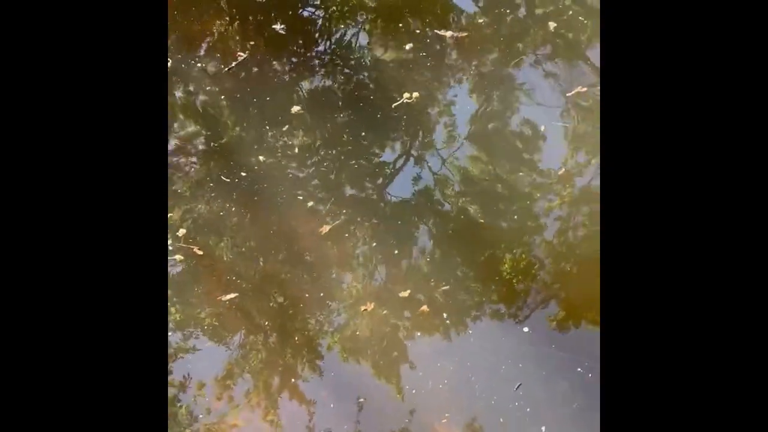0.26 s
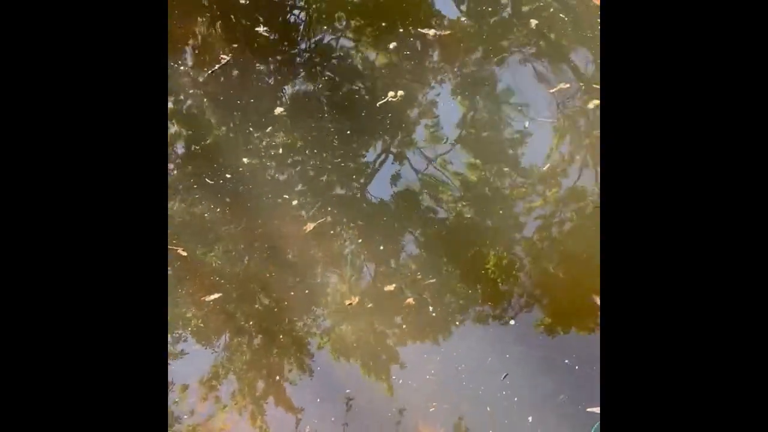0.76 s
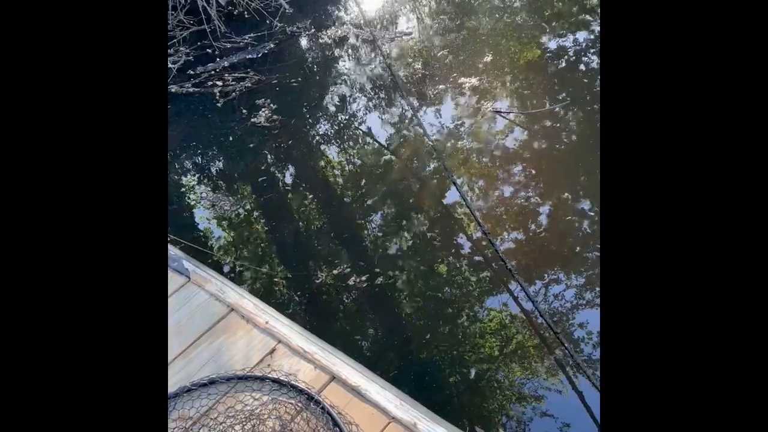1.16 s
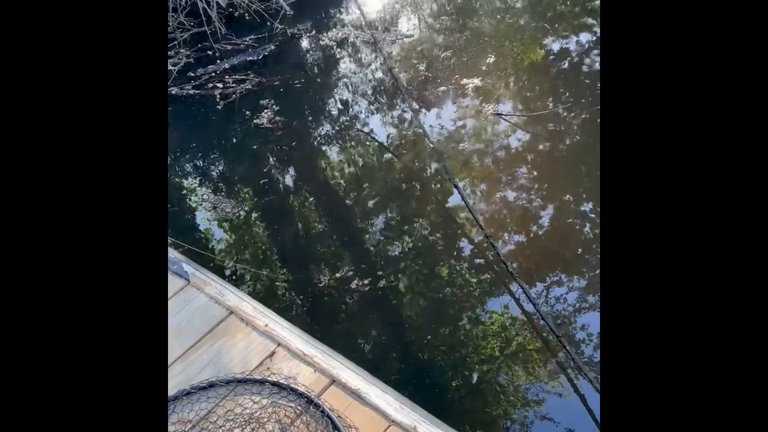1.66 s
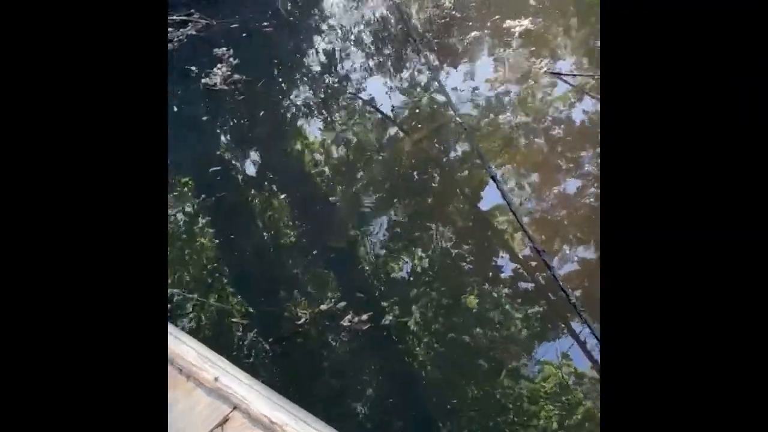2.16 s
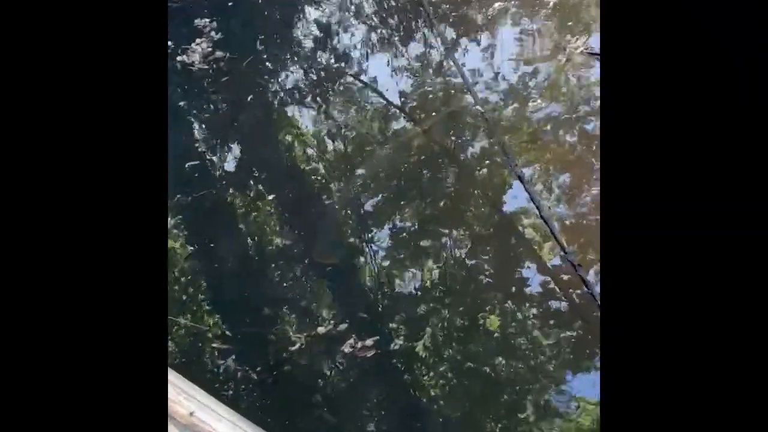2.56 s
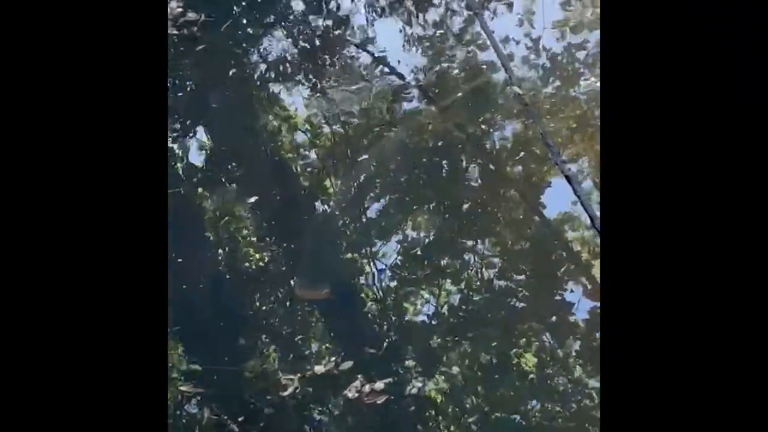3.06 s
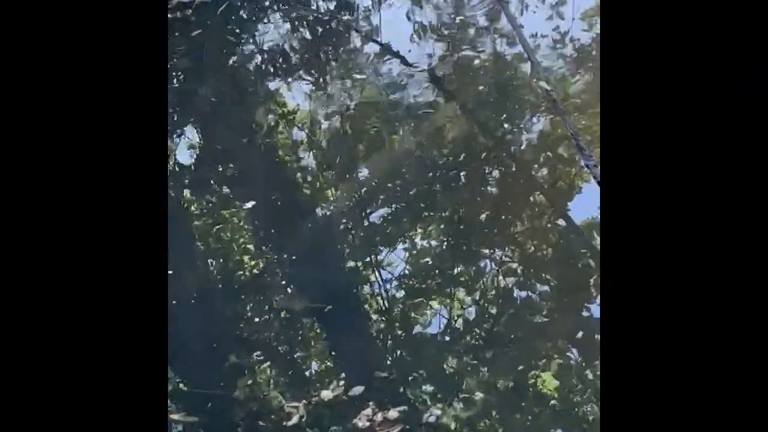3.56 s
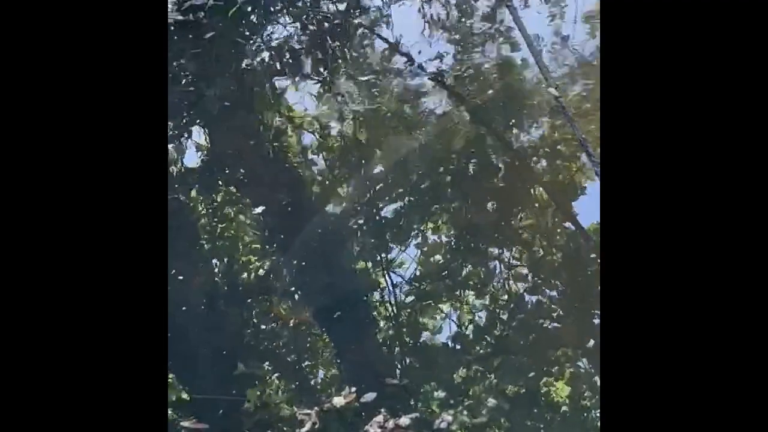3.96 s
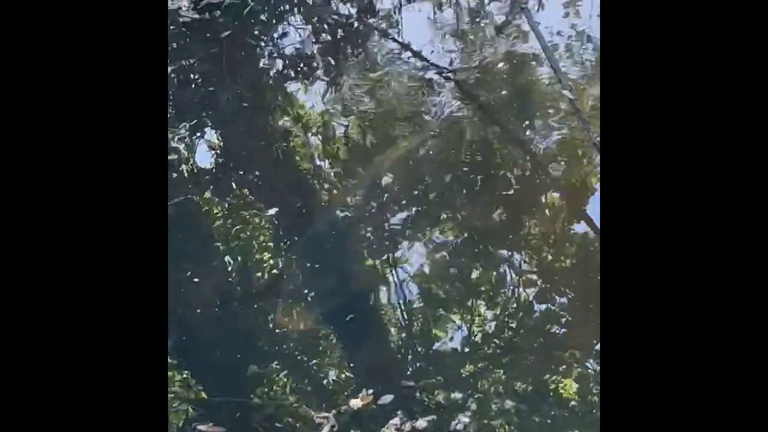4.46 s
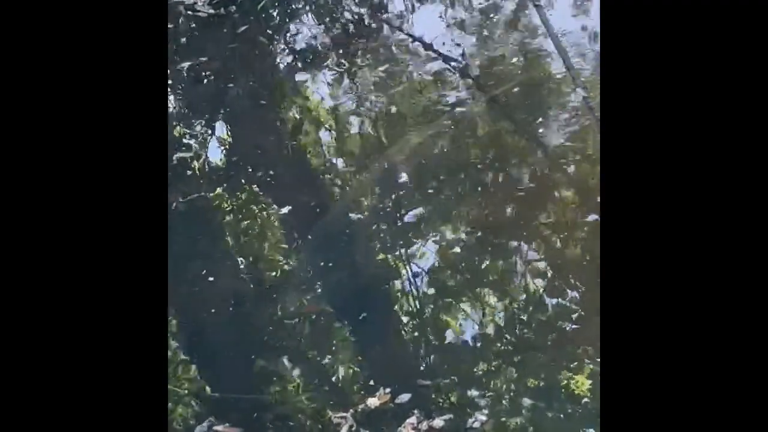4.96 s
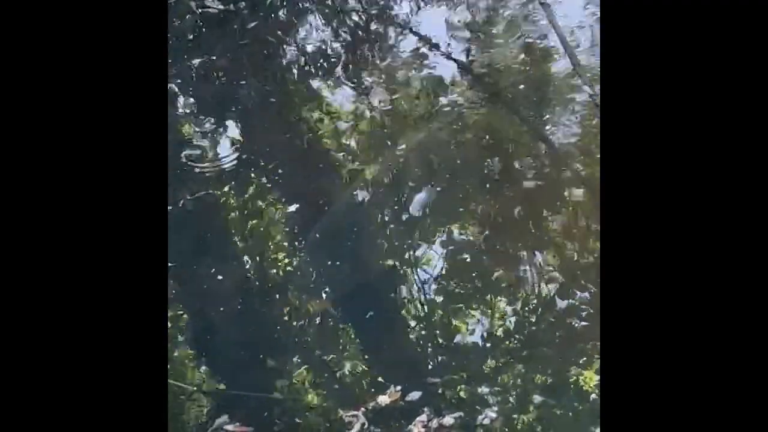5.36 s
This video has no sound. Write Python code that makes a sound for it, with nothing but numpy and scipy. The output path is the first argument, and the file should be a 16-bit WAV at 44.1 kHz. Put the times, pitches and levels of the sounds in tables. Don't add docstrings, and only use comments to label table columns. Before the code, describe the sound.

Quiet wooded pond heard from a boat in stereo. Distant road rumble opens, then a brief buzzy crackle and tiny silence at one second cut to a fuller low vehicle drone. It swells mid-way and fades after four seconds, with small hull knocks and faint leaf ticks. A bright bird chip rings among trees, followed by weak calls.

```python
import sys
import numpy as np
from scipy import signal
from scipy.fft import rfft, irfft, next_fast_len
from scipy.io import wavfile
from scipy.ndimage import uniform_filter1d

SR = 44100
rng = np.random.default_rng(int(sys.argv[2]) if len(sys.argv) > 2 else 0)


def dump(signal):
    limited = np.clip(np.atleast_2d(signal).T, -1, 1)
    pcm = np.round(limited * 32767).astype(np.int16)
    wavfile.write(sys.argv[1], SR, pcm)


def gain_from_decibels(decibels):
    exponent = np.asarray(decibels, float) / 20
    return 10 ** exponent


N = 247401
T = np.arange(N) / SR
M = next_fast_len(N, True)
F = np.maximum(np.fft.rfftfreq(M, 1 / SR), 1)
SLIP_S, MUTE_S, BACK_S = 1.00528, 1.0397, 1.05168


def over_hz(table, column=1):
    rows = np.array(table, float)
    return np.interp(np.log(F), np.log(rows[:, 0]), rows[:, column])


def unit(x):
    return x / np.sqrt(np.mean(x ** 2))


def walk(rate):
    k = int(SR / rate)
    held = np.repeat(rng.standard_normal(N // k + 1), k)
    return 1.3 * uniform_filter1d(uniform_filter1d(held, k), k)[:N]


def band(x, hz, width):
    edges = np.clip([hz - width / 2, hz + width / 2], 20, .45 * SR)
    return signal.sosfilt(signal.butter(2, edges, "band", fs=SR, output="sos"), x)


def filtered(x, response):
    return irfft(rfft(x, M) * response, M)[:N]


def bell(hz, width, power=2):
    return np.exp(-((F - hz) / width) ** power)


def progress(start, length):
    return np.clip((T - start) / length, 0, 1)


LAYER_HZ = [65, 420, 1000, 4000, 6500]
# frequency in Hz, level in dB per Hz.
LOW_COLOUR = [
    [(12, -48), (20, -16), (33, -19), (60, -8), (92, -2), (134, -9.5), (151, -13.5), (177, -12.5),
     (232, -23.5), (288, -20.5), (367, -25), (431, -23.5), (500, -27), (650, -57), (1100, -120)],
    [(12, -50.5), (20, -28), (35, -15.5), (60, 0), (98, -5.5), (130, -2.5), (168, -11.5), (208, -10),
     (238, -13.5), (280, -16.5), (316, -18), (403, -20.5), (500, -27.5), (650, -55), (1100, -120)],
]
# frequency in Hz, level in dB per Hz.
HIGH_COLOUR = [
    [(210, -33), (350, -7), (431, -1.5), (585, -12), (834, -3), (903, -8), (1010, -8.5), (1540, -17),
     (2020, -23), (2330, -23), (3660, -37), (4030, -42), (6630, -53), (7540, -47), (16300, -57.5)],
    [(210, -31), (350, -1), (379, -6), (604, -11.5), (645, -5.5), (710, -11), (769, -7), (903, -6),
     (1130, -13.5), (2050, -23), (2350, -29), (2650, -39.5), (2900, -38), (3270, -33.5), (5920, -51),
     (7400, -48), (9700, -50), (10350, -56.5), (11100, -51.5), (16300, -59)],
]
BAND_FLICKER_DB = np.repeat([1.2, 1.9, .4], [14, 2, 4])
# time in seconds, level in dB.
NEARNESS = [
    [(0, 1.5), (.35, 1), (.7, -1), (1, -1)],
    [(1.06, 1.5), (1.35, 1), (1.65, 3.5), (1.9, 1.5), (2.1, 4), (2.35, 1.5), (2.6, 4.5), (2.9, 1.5),
     (3.2, 2), (3.7, -0.5), (4.1, -0.5), (4.5, -2.5), (5, -3), (5.6, -3)],
]
TYRE_ROAR_DB = (-62.5, -63.5)
NEARNESS_SHARE = [
    [2, 1.5, 0.56, 1.7, .05],
    [0.023, 1.45, 0.73, 1.1, .05],
]
LAYER_SURGE_DB = [0.96, 1.3, 0.25, 0.48, .05]
# frequency in Hz, right lead in radians, left minus right in dB, unshared share (0-1).
PORT_OFFSETS = [(70, .03, 0, .015), (95, .047, 0, .02), (140, .04, .1, .04), (200, .13, .6, .1),
                (285, .28, 1.3, .18), (400, .58, 1, .3), (570, .9, .2, .45), (800, .45, .9, .35),
                (1150, .6, 1.5, .45), (1600, .5, .7, .45), (1900, 0, .5, .25), (2400, -1.5, .5, .55),
                (3000, -1.6, 0, .5), (3900, -1, 0, .4), (4600, -1.3, -.3, .55), (5700, -1.6, 0, 1),
                (6200, 1.6, 0, 1), (6800, 1.1, 0, .7), (7200, .5, 0, .3), (7500, .1, 0, .1),
                (13000, .1, 0, .1)]


def road_colours():
    colours = []
    for roar_db, low, high in zip(TYRE_ROAR_DB, LOW_COLOUR, HIGH_COLOUR):
        lo, hi = over_hz(low), over_hz(high)
        join_hz = 420
        join = np.searchsorted(F, join_hz)
        db = np.where(F < join_hz, lo - lo[join] + hi[join], hi)
        roar = gain_from_decibels(db[(F > 700) & (F < 1600)])
        colours.append(gain_from_decibels(db + roar_db) / np.sqrt(np.sum(roar ** 2) / len(F)))
    return np.array(colours)


def road():
    port_share = np.array([np.ones_like(F), np.clip(over_hz(PORT_OFFSETS, 3), 0, 1)])
    noise = rfft(rng.standard_normal((2, M))) * port_share
    colours = road_colours()[:, None]
    near_before, near_after = (np.interp(T, *np.transpose(rows)) for rows in NEARNESS)
    after = T > SLIP_S
    swell = []
    for early, late, surge_db in zip(*NEARNESS_SHARE, LAYER_SURGE_DB):
        swell.append(np.where(after, late * near_after, early * near_before) + surge_db * walk(5))
    out = 0
    half_octaves = np.log2(F / 25) * 2
    for k in range(20):
        share = np.cos(np.clip(half_octaves - k, -1, 1) * np.pi / 2) ** 2
        place = np.interp(np.log(25 * 2 ** (k / 2)), np.log(LAYER_HZ), np.arange(5))
        i = min(int(place), 3)
        db = swell[i] + (place - i) * (swell[i + 1] - swell[i]) + BAND_FLICKER_DB[k] * walk(12)
        before_sound, after_sound = irfft(noise * share * colours, M)[..., :N]
        out = out + gain_from_decibels(db) * np.where(after, after_sound, before_sound)
    return out


# centre time in seconds, length in seconds, band centre in Hz, level in dB.
LEAF_SWELLS = [(2.272, 0.015, 5274, -86), (2.5, .015, 5070, -87.5), (2.492, 0.22, 12550, -88.5),
               (2.385, .008, 12830, -91), (2.416, .02, 13770, -87), (2.444, .012, 14000, -84),
               (2.465, .016, 12000, -84), (2.497, .022, 12850, -83.5), (2.527, .01, 13200, -85.5),
               (2.556, .014, 13000, -82), (2.59, .016, 12500, -87.5), (2.612, .008, 12190, -90),
               (3.494, .007, 5000, -81.5), (1.31, .015, 5000, -89.5), (3.02, .015, 5100, -95),
               (3.572, .012, 10520, -88), (4.66, 0.089, 3650, -89), (4.8, 0.12, 3800, -87),
               (4.85, 0.087, 4600, -89), (4.94, .04, 5200, -88), (5.17, 0.086, 3380, -87),
               (5.2, 0.12, 5000, -91), (5.33, 0.12, 3530, -89), (5.3, .2, 4800, -90),
               (5.58, .08, 3500, -86), (5.0, .06, 6150, -91), (5.05, .3, 4700, -93),
               (.163, .01, 900, -61.5), (1.564, .01, 903, -58), (2.033, .01, 795.6, -54.5),
               (3.252, .01, 900.3, -65), (2.749, 0.044, 11990, -93), (3.25, 0.011, 5100, -84.5),
               (3.493, 0.0054, 7900, -77), (3.555, 0.017, 8910, -76.5), (3.556, 0.016, 12200, -77.5),
               (3.655, .04, 3228, -93), (3.897, .04, 8390, -85), (3.902, 0.042, 12900, -86),
               (3.995, 0.048, 8000, -90), (4.203, 0.01, 13000, -86), (4.213, 0.0034, 12000, -74.5),
               (4.748, 0.045, 14560, -86), (4.781, 0.073, 253, -57), (4.94, 0.06, 4300, -86),
               (4.95, .09, 3600, -86), (.19, .05, 3700, -87.5), (.3, .03, 3750, -87), (.5, .35, 7800, -97),
               (1.53, .06, 7500, -93), (3.494, .006, 12000, -85), (3.556, .016, 5100, -86),
               (5.03, 0.13, 3970, -85.5)]
# centre time in seconds, length in seconds, Hz, level
# in dB.
OPPOSED_SWELLS = [
    (2.4, 1.6, 10480, -99),
    (2.5, .1, 14300, -93),
    (5.05, .07, 5650, -84),
    (5.202, .016, 5700, -86),
    (4.93, .04, 4400, -86),
]


def rustles(swells):
    grains_per_s, grains_each = 3200, 48
    width_share, tick_s = 0.18, 0.0075
    out = np.zeros(N)
    for s, length, hz, db in swells:
        reach = 1.5 * length + .01
        near = slice(max(int((s - reach) * SR), 0), int((s + reach) * SR))
        chance = rng.random((3, len(T[near])))
        rate = grains_per_s + grains_each / length
        width = hz * (width_share + .5 * (tick_s / length) ** 2)
        strength = gain_from_decibels(-2.2 * np.log(chance[1] + .02))
        grains = (chance[0] < rate / SR) * strength * np.sign(chance[2] - .5)
        envelope = np.exp(-4 * ((T[near] - s) / length) ** 2)
        out[near] += gain_from_decibels(db) * unit(band(grains, hz, min(width, .4 * hz))) * envelope
    return out


# start in seconds, length in seconds, start in Hz, end in Hz, level in dB.
FAR_WHISTLES = [(-.05, 0.19, 3300, 3260, -85), (.29, 0.19, 8500, 8540, -101), (.3, 0.34, 2310, 2280, -78),
                (-.03, 0.12, 2330, 2310, -80), (.4, 0.053, 7320, 7440, -88), (.42, 0.09, 7700, 7800, -93),
                (.53, .06, 7750, 7750, -95), (.65, .04, 7800, 7750, -96), (.46, .06, 7350, 7350, -95),
                (1.06, 3.7, 9480, 9490, -107), (1.07, 2.7, 9690, 9800, -106), (1.5, 0.079, 7550, 7600, -91),
                (2.78, .04, 6720, 6650, -91), (5.27, 0.039, 7403, 7200, -94), (5.34, .04, 7150, 6700, -93),
                (4.76, .1, 3600, 3720, -91), (4.92, 0.12, 4250, 3800, -89), (5.11, .14, 4900, 5100, -101),
                (5.14, 0.07, 3500, 3250, -88), (5.51, 0.12, 7000, 6700, -94), (5.28, 0.13, 3680, 3500, -91)]
# start in seconds, length in seconds, start in Hz, end in Hz, level in dB.
FAR_HUMS = [
    (0.35, 0.42, 92, 99.5, -47.5),
    (0, 0.62, 54, 200, -53),
    (1.5, 0.87, 100, 190, -56.5),
    (4, 0.23, 80, 72.4, -49),
    (3.5, .1, 82, 74, -48),
]
# start in seconds, length in seconds, start in Hz, end in Hz, level in dB.
OPPOSED_WHISTLES = [
    (4.95, .19, 6350, 5450, -89),
]


def whistles(notes, scoop, shake):
    out = np.zeros(N)
    for s, length, hz0, hz1, db in notes:
        u = progress(s, length)
        hz = (hz0 + (hz1 - hz0) * u ** 2) * (1 - scoop * np.exp(-u / .06) + shake * walk(140))
        envelope = np.clip(6 * u * (1 - u), 0, 1)
        out += gain_from_decibels(db + 2.5 * walk(70)) * envelope * np.sin(2 * np.pi * np.cumsum(hz) / SR)
    return out


# start in seconds, length in seconds, top in Hz, end in Hz, level in dB.
ARCHED_CALLS = [
    (5.25, .125, 5660, 5400, -76),
    (5.478, 0.1, 5670, 5400, -78),
]


def arches():
    out = np.zeros(N)
    for s, length, hz0, hz1, db in ARCHED_CALLS:
        u = progress(s, length)
        scoop = .1 * np.exp(-u * length / .005)
        droop = .02 * u ** 6
        hz = (hz0 + (hz1 - hz0) * u ** .7) * (1 - scoop - droop + .004 * walk(140))
        envelope = np.sin(np.pi * u ** .8).clip(0) ** .6
        out += gain_from_decibels(db + 2.5 * walk(60)) * envelope * np.sin(2 * np.pi * np.cumsum(hz) / SR)
    return out


# start in seconds, start in Hz, end in Hz, sweep in seconds, level in dB.
BIRD_CHIP = (4.723, 6053, 8000, .011, -58)


def chip():
    t60_s, wet_db, octave_db = 0.54, -8, -33
    s, hz0, hz1, length, db = BIRD_CHIP
    t = np.arange(int(length * SR)) / SR
    phase = 2 * np.pi * np.cumsum(hz0 + (hz1 - hz0) * t / length) / SR
    note = np.sin(np.pi * t / length) * (np.sin(phase) + gain_from_decibels(octave_db) * np.sin(2 * phase))
    lag = np.arange(SR // 2) / SR
    decay = gain_from_decibels(-60 * lag / t60_s) + 3.4 * gain_from_decibels(-60 * lag / 0.19)
    trunks = gain_from_decibels(wet_db - 23.5) * rng.standard_normal(len(lag)) * gain_from_decibels(1.5 * walk(90)[:len(lag)]) * decay
    trunks[0] = 1
    heard = np.convolve(note, trunks)
    out, i = np.zeros(N + SR), int(s * SR)
    out[i:i + len(heard)] = gain_from_decibels(db) * heard
    return out[:N]


# start in seconds, length in seconds, first frequency in Hz, level in dB.
HULL_KNOCKS = [(.91, .02, 500, -59), (.985, .018, 600, -56), (1.064, .02, 1100, -48),
               (1.139, .018, 1000, -48), (1.172, .02, 1000, -47), (1.567, .015, 800, -50),
               (3.488, .012, 1000, -53), (3.546, .026, 1100, -50), (3.99, .016, 1000, -53),
               (4.025, .016, 600, -53), (4.393, .018, 1100, -50)]


def knocks():
    out = np.zeros(N)
    for s, length, hz, db in HULL_KNOCKS:
        u = progress(s, length)
        fall = np.sin(2 * np.pi * np.cumsum(hz * 0.11 ** u) / SR)
        rattle = unit(band(rng.standard_normal(N), 600, 800))
        out += gain_from_decibels(db) * np.sqrt(np.sin(np.pi * u).clip(0)) * (.6 * fall + .45 * rattle)
    return out


# time in seconds, engine cycle in Hz, effort in dB, clearance over the bank in dB.
ENGINE_DRIVE = [(1.1, 46.39, 2, -7.5), (1.25, 46.6, -1, -8), (1.45, 46.5, -1.5, -5.5),
                (1.62, 46.64, 2, -6.5), (1.88, 46.81, 1.5, -5.5), (2.05, 47.14, 1.5, -3),
                (2.2, 47.02, -1, -1.5), (2.38, 47.07, -1.5, 0.5), (2.6, 47.3, 2, -2),
                (2.78, 47.23, -2.5, 1), (2.95, 47.2, -0.5, 1.5), (3.15, 47.57, 1.5, -4.5),
                (3.4, 47.24, 0, -1.5), (3.66, 47.26, -2.5, 0), (3.81, 46.87, -10, 0.5),
                (3.95, 46.93, -7.5, -1.5), (4.1, 45.16, -14.5, -5.5)]
# order, level in dB, share of clearance felt.
EXHAUST_ORDERS = [
    (2, -44, -0.32),
    (3, -43, 1.3),
    (4, -47, 1.1),
    (5, -56.5, 0.41),
    (6, -63, 0.5),
    (7, -71, 1.8),
    (8, -65, 2),
]


def vehicle():
    s, hz, effort, clear = np.transpose(ENGINE_DRIVE)
    phase = 2 * np.pi * np.cumsum(np.interp(T, s, hz) * (1 + 0.0012 * walk(12))) / SR
    effort, clear = np.interp(T, s, effort), np.interp(T, s, clear)
    out = 0
    for order, db, share in EXHAUST_ORDERS:
        k = np.round(order)
        start = 1.05 * k ** 2
        level = gain_from_decibels(db + effort + share * clear + (0.16 + 0.44 * k) * walk(10))
        out = out + level * np.sin(k * phase + start + 0.039 * k * walk(17))
    puffs = unit(band(rng.standard_normal(N), 353, 320) * (1 + 0.55 * np.sin(2 * phase)))
    out = out + gain_from_decibels(-62.5 + effort + 1.4 * clear + 3.5 * walk(8)) * puffs
    gone_s, fade_s = 4.29, 0.17
    return np.sqrt(2) * out * (T > SLIP_S) * np.clip((gone_s - T) / fade_s, 0, 1)


# centre in Hz, width in Hz, depth (0-1).
PORT_CANCEL = (5950, 320, .7)
# from seconds, to seconds, depth (0-1).
TURNED_CANCEL = (1.05, 1.85, .2)
# from seconds, to seconds, centre in Hz, width in Hz, depth
BRIEF_DIP = (4.722, 4.81, 9600, 1450, .8)
# centre in Hz, width in Hz, share.
CHIP_APART = (6300, 550, .8)
# centre in Hz, width in Hz.
CHIP_TOGETHER = (7350, 950)


def cancel_and_dip(mid):
    hz, width, depth = PORT_CANCEL
    start, end, eased = TURNED_CANCEL
    lost = filtered(mid, bell(hz, width, 4))
    mid = mid - lost * np.where((T > start) & (T < end), eased, depth + .12 * walk(4))
    start, end, hz, width, depth = BRIEF_DIP
    dipped = filtered(mid, bell(hz, width, 8))
    return mid - depth * dipped * np.clip(3 * (end - T) / (end - start), 0, 1) * (T > start)


def scene():
    shared, unshared = road()
    bird, calls = chip(), arches()
    mid = shared + vehicle() + rustles(LEAF_SWELLS)
    mid = mid + whistles(FAR_WHISTLES, 0.027, 0.0027) + whistles(FAR_HUMS, 0, 0.0077)
    mid = mid + filtered(bird, bell(*CHIP_TOGETHER) + (F > 11000))
    level_lean = np.tanh(over_hz(PORT_OFFSETS, 2) * np.log(10) / 40)
    phase_lean = np.tan(np.clip(over_hz(PORT_OFFSETS), -2, 2) / 2)
    side = filtered(mid, level_lean - 1j * phase_lean) + unshared
    side = side + rustles(OPPOSED_SWELLS) + knocks() + whistles(OPPOSED_WHISTLES, 0, .015)
    hz, width, share = CHIP_APART
    side = side + calls + filtered(bird, -1j * share * bell(hz, width))
    mid = cancel_and_dip(mid) + gain_from_decibels(-9) * filtered(calls, 1j)
    return np.array([mid + side, mid - side])


def low_pass(x):
    return signal.sosfilt(signal.butter(12, 16000, fs=SR, output="sos"), x)


BUFFER_JUMPS = [(2, -2, -4), (3, 2, 0), (4, -3, 1), (5, 10, -4), (6, -8, 2), (7, -6, 1), (8, 8, 0),
                (9, -2, 0), (10, -7, 0), (11, 9, 0), (12, -4, -1), (13, 2, 2), (14, 6, -1), (15, -9, -2),
                (16, 0, -2), (17, 3, -2), (18, -1, 0), (19, -3, 3), (20, 8, -1), (22, -4, 0), (23, 7, -1),
                (24, -13, 1), (25, -2, 0), (26, 19, -2), (27, -18, 0), (28, 5, 0), (29, 8, 0), (30, -6, 1),
                (31, -6, 2)]
SILENCE_EDGES = [
    (9, 1),
    (6, -5),
    (-7, 0),
    (3, 0),
]


def record(dry):
    buffer = 48
    out = dry.copy()
    a, b, c = (int(s * SR) for s in (SLIP_S, MUTE_S, BACK_S))
    ports = np.array([[1, 1], [1, -1]]) / 1000
    out[:, a:b] -= (1 - gain_from_decibels(-3)) * out[:, a:b].mean(axis=0)
    fade = np.exp(-np.arange(400) / (0.0012 * SR))
    quick = np.exp(-np.arange(len(fade)) / (0.00046 * SR))
    for k, both, apart in BUFFER_JUMPS:
        i = a + k * buffer
        out[:, i:i + len(fade)] += ports @ [both * fade, apart * quick]
    for i, way, edge in zip((a - 1, a + buffer, b - 1, c), (-1, 1, -1, 1), SILENCE_EDGES):
        out[:, i + way * np.arange(len(fade))] += np.outer(ports @ edge - out[:, i], fade)
    out[:, :200] *= np.linspace(.55, 1, 200)
    out[:, a:a + buffer] = 0
    out[:, b:c] = 0
    out = signal.sosfiltfilt(signal.ellip(6, .1, 40, 16000, fs=SR, output="sos"), out)
    return low_pass(out)


dry = scene()
out = record(dry)
dump(out)
```